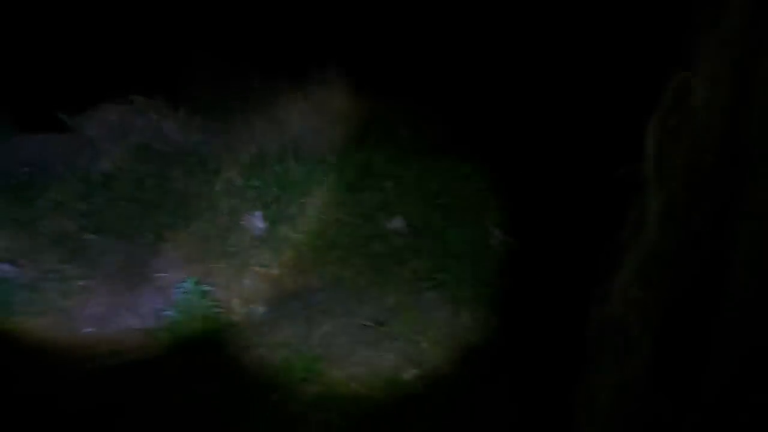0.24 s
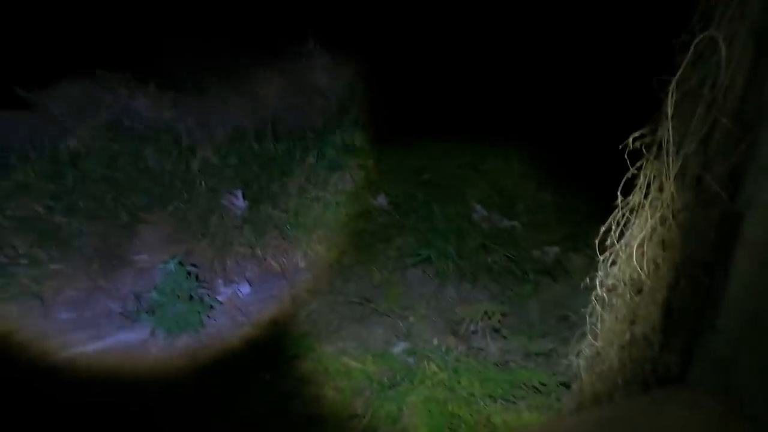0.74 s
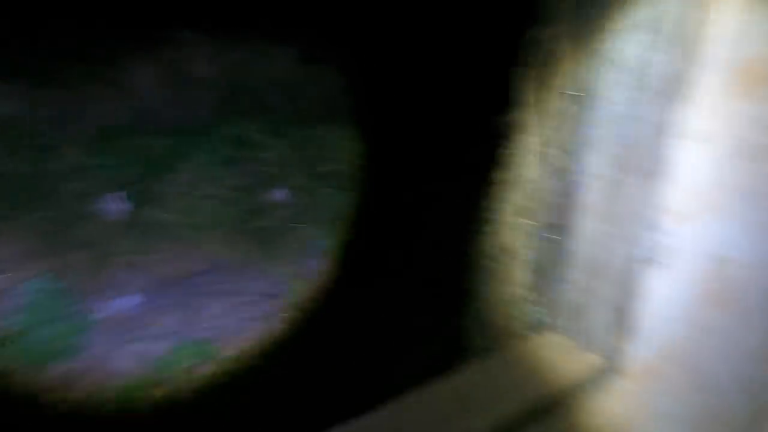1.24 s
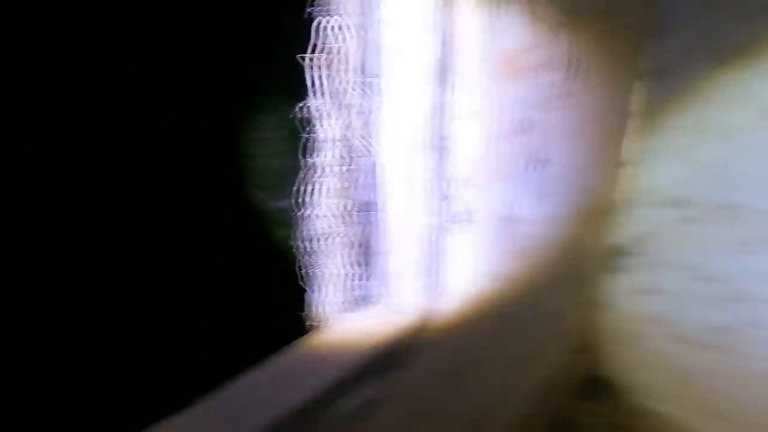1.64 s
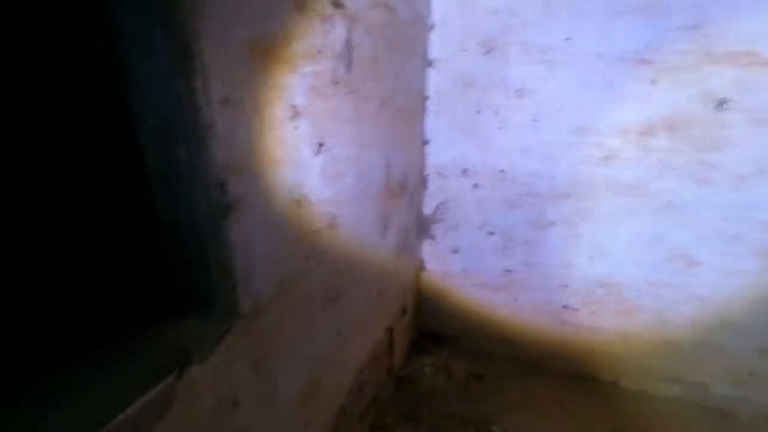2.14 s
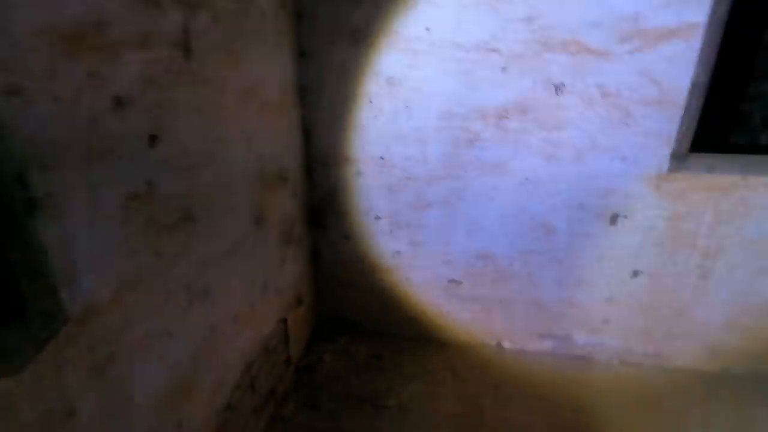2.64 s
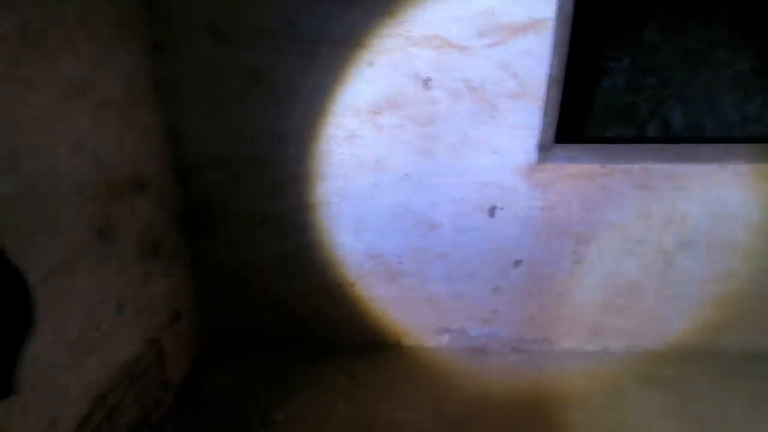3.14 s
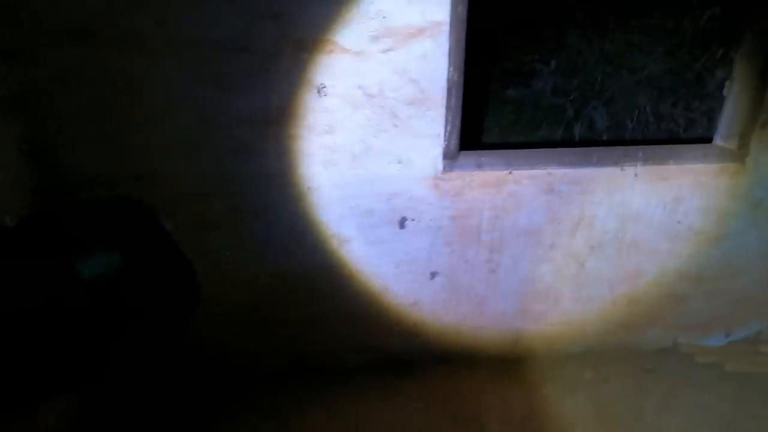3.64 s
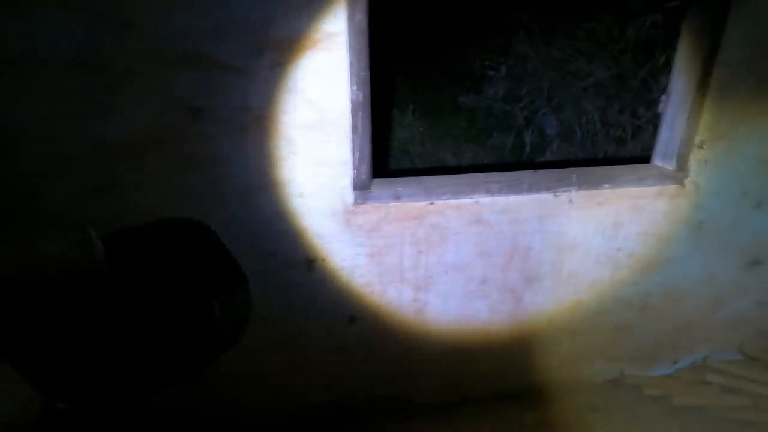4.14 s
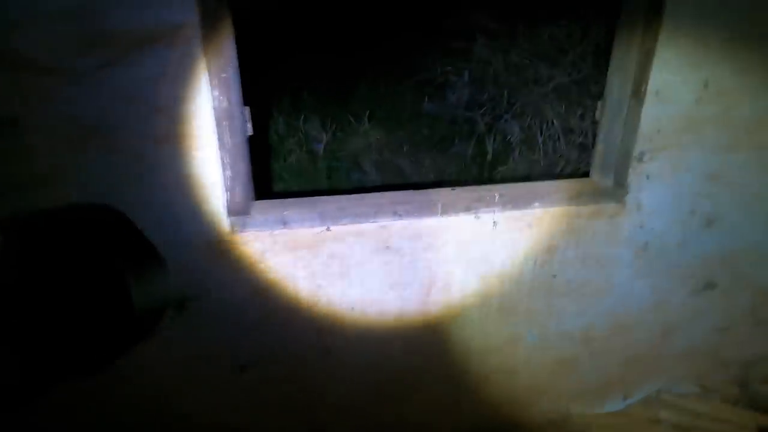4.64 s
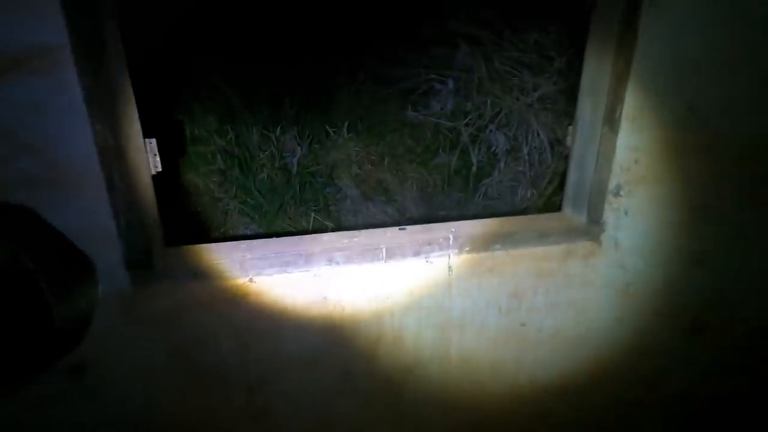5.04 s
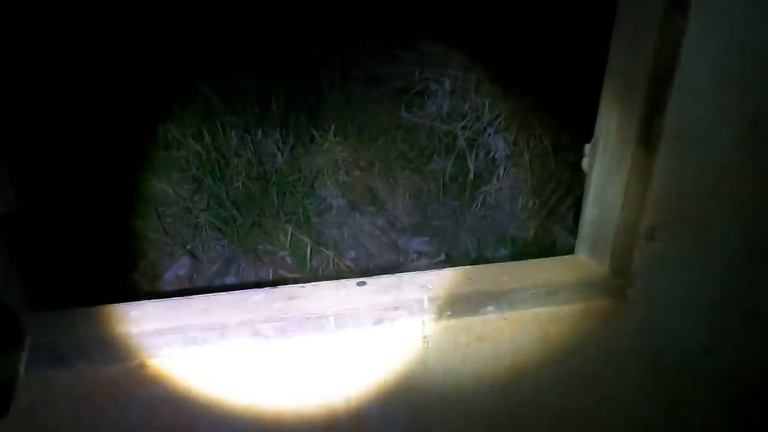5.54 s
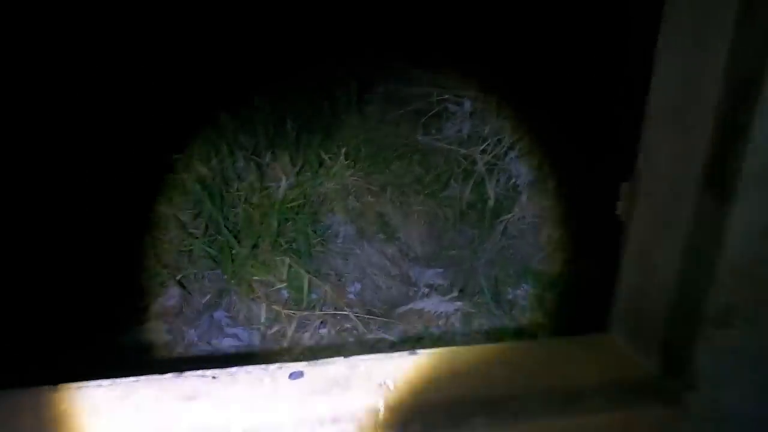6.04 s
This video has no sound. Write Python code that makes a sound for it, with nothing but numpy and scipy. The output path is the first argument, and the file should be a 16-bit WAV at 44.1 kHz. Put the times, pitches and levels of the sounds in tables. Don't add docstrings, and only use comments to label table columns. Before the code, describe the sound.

Close handheld microphone in a small bare room at night. Crickets pulse beyond open windows over faint steady air. A dull heel thud and cloth scuff come first, with low handling rumble; later, grit crackles underfoot, a metal scrap clinks, and hard debris snaps sharply with a short ringing slat and live wall reflections. Light scuffs and a hand jolt end it.

```python
import sys
import numpy as np
from scipy import signal
from scipy.fft import rfft, irfft, next_fast_len
from scipy.io import wavfile
from scipy.ndimage import uniform_filter1d

SR = 44100
rng = np.random.default_rng(int(sys.argv[2]) if len(sys.argv) > 2 else 0)


def attenuation_scalar(level_db):
    decades = np.asarray(level_db, float) / 20
    return 10 ** decades


def master_out(mix):
    frames = np.transpose(np.atleast_2d(mix))
    ceiling = np.clip(frames, -1, 1)
    pcm = np.round(ceiling * 32767).astype(np.int16)
    wavfile.write(sys.argv[1], SR, pcm)


N = 277389
T = np.arange(N) / SR
SHADE = .5

# [t/s, low choir level/dB, high choir level/dB]
CHORUSES = [
    [(0, -71, -79), (1.1, -57, -67), (1.98, -57.5, -63), (2.53, -56, -59.5), (3.1, -60, -56.5),
     (3.93, -61, -54), (4.5, -64.5, -56), (5.75, -69, -61), (5.82, -71, -58), (6.29, -77, -59)],
]


def snaps():
    # [t/s, delay/s]
    floor_bounce = [(4.5, .0028), (5.0, .0033), (5.25, .0033), (5.4, .0026)]
    out, near = np.zeros((2, 2, N))
    sounds = grit() + chips() + shards(near) + kicks()
    for s, sound, direct_db, bounce_db in sounds:
        add(out, s, sound)
        add(near, s, (attenuation_scalar(direct_db) - 1) * signal.lfilter([1 - SHADE], [1, -SHADE], sound))
        add(near, s + curve(floor_bounce, s), attenuation_scalar(4 + bounce_db) * sound, 1)
    low_cut = signal.butter(2, 450, "high", fs=SR, output="sos")
    return signal.sosfilt(low_cut, room(out, tail_db=6.0) + near)


def grit():
    # [t/s, level/dB, brightness/dB, hollowness/dB]
    grains = [(2.82, -67, 12, -1), (2.884, -85, 28, 5), (2.907, -53.5, -11, -2.5), (3.64, -58, -22.5, 2.5),
              (3.735, -52.5, -11, 5), (3.744, -69, 6, 1), (3.769, -56, -4, 1), (3.791, -58, 0.5, 12.5),
              (3.887, -60, -7, 16), (3.939, -54.5, -0.5, 9), (4.194, -52, -13, -11), (4.323, -72, 7, -2),
              (4.371, -80, 14.5, 4), (4.42, -51, -9, -11), (4.556, -45.5, 3, 4), (4.66, -55.5, -9.5, 15.5),
              (4.673, -44.5, 3, 0.5), (4.675, -46, 11.5, -5.5), (4.694, -57, 7, -8), (4.8077, -53, 11, -3),
              (4.837, -44.5, 1, 0), (5.3047, -38, -6.5, -3), (5.597, -50.5, 5.5, 11.5), (5.612, -42, 1, -1),
              (5.686, -45, 7, -25), (6.141, -51.5, -5.5, 8), (6.145, -55, 6, 4), (6.154, -52, 8, -4),
              (6.1815, -52, -11, 3), (6.257, -55, -16, 5)]
    lucks = rng.standard_normal((len(grains), 2, 513))
    return [(s, crack(*manner_db, luck), 0, 0) for (s, *manner_db), luck in zip(grains, lucks)]


def chips():
    # [t/s, level/dB, f/Hz, width/Hz]
    splits = [
        (5.4366, -24.5, 1370, 500),
    ]
    return [(s, attenuation_scalar(db) * ring(hz, width), 9, 0) for s, db, hz, width in splits]


def shards(near):
    # [t/s, level/dB, direct above usual/dB, floor bounce above usual/dB, extra wall slap/dB]
    splits = [
        (5.0338, -33.5, 9, 3.5, -12),
        (5.067, -20, 7, 5, -10),
        (5.1952, -17, 4, 1, -10),
        (5.417, -16.5, 3, 0, 1.5),
        (5.438, -14, -9, 1.5, 2),
    ]
    # [f/Hz, level/dB]
    colours = [
        [(350, -59), (600, -39), (1700, -3), (2940, -1), (3560, -6), (5010, 3.5), (8320, -14), (11700, -16),
         (15800, -62)],
        [(350, -51), (600, -24.5), (2600, -0.5), (3420, -7), (4550, 1.5), (7560, -17.5), (10400, -35),
         (11600, -23), (15800, -61)],
        [(350, -48), (600, -32), (2270, -1), (3020, -8), (4140, 2.5), (7770, -5), (9160, -14.5), (11200, -5),
         (15800, -34)],
        [(350, -47), (600, -25), (880, -7), (1630, 1), (3920, -1), (4430, -13), (6960, -3), (11700, -31),
         (15800, -47)],
        [(350, -46), (600, -6), (660, -14), (1020, -8), (1680, 1), (2600, -5.5), (5010, -3.5), (11600, -26.5),
         (15800, -46)],
    ]
    split_s, split_hz, slap_s = .0008, 2300, .0093
    bins = np.fft.rfftfreq(1024, 1 / SR)
    sounds = []
    for k, ((s, db, direct_db, bounce_db, slap_db), colour) in enumerate(zip(splits, colours)):
        late = split_s * np.sin(np.pi * bins / split_hz + 2 * k) ** 4
        sound = click(db + read(colour, bins), late)
        sounds.append((s, sound, direct_db, bounce_db))
        add(near, s + slap_s, attenuation_scalar(slap_db) * sound, 3)
    return sounds


def kicks():
    # [t/s, level/dB, pitch factor]
    hits = [
        (4.551, -45.5, 1.002),
        (4.563, -41, 1.01),
        (4.579, -48, 1.003),
        (5.355, -48.5, .995),
    ]
    # [f/Hz, level/dB, t60/s]
    scrap = [(1965, -13, 0.048), (2470, -14, .04), (2874, -5, 0.044), (3220, -8, 0.034), (4660, -15, 0.035),
             (4883, -9.5, 0.043), (5760, -14.5, 0.55), (5695, -0.5, 0.053), (8812, -18, 0.028),
             (10000, -21, .025), (11130, -16, .04), (11700, -16, .025), (12900, -26, .04),
             (14700, -32, .05)]
    sounds = []
    for s, db, factor in hits:
        modes = [attenuation_scalar(g) * ring(hz * factor, width_of(t60), .3) for hz, g, t60 in scrap]
        sounds.append((s, attenuation_scalar(db) * sum(modes), 9, -10))
    return sounds


def crack(db, bright_db, hollow_db, luck):
    # [f/Hz, level/dB]
    grit_colour = [(400, -29), (900, -3.5), (1300, 1), (2600, 6), (3200, 3), (4300, 3.5), (5700, 3),
                   (7400, -1), (8600, -10), (10000, -14), (11500, -15.5), (12800, -19), (14500, -45),
                   (17000, -95)]
    ends_hz = [1300, 8000]
    hz = np.fft.rfftfreq(1024, 1 / SR)
    uneven = evened(uniform_filter1d(luck, 16, 1))
    place = read(np.c_[ends_hz, [-1, 1]], hz)
    colour_db = read(grit_colour, hz) + db + bright_db * place + hollow_db * place ** 2
    return click(colour_db + 2.4 * uneven[0], late=.0005 * abs(uneven[1]))


def click(colour_db, late=0.):
    log_gain = np.log(attenuation_scalar(colour_db))
    mirrored = np.r_[log_gain, log_gain[-2:0:-1]]
    causal = np.exp(np.conj(signal.hilbert(mirrored)))[:len(log_gain)]
    phase = 2 * np.pi * np.cumsum(late + 0 * log_gain) * SR / 1024
    return 7 * irfft(causal * np.exp(-1j * phase))[:512]


def thuds():
    # [t/s, level/dB, f/Hz, width/Hz]
    heels = [(.177, -37.5, 191, 112), (2.695, -44, 156, 95), (3.116, -47.5, 170, 80), (3.215, -48, 180, 82),
             (3.638, -46, 303, 117), (4.036, -42, 163, 98), (4.19, -49, 203, 100), (4.532, -30, 277, 115),
             (4.553, -29, 174, 99.3), (5.065, -46.5, 386, 148), (5.194, -41, 336, 152),
             (5.3117, -36.5, 322, 81), (5.331, -45, 310, 89.6), (5.3545, -41.5, 255, 110),
             (5.417, -30.5, 422, 149), (5.438, -31, 406, 152), (5.47, -37.5, 223, 50),
             (6.149, -46, 300, 90), (6.212, -51, 300, 70), (6.259, -43, 500, 100), (6.268, -46, 523, 110)]
    out = np.zeros((2, N))
    for s, db, hz, width in heels:
        add(out, s, attenuation_scalar(db + 9.5) * ring(hz, width, .06))
    return signal.sosfilt(signal.butter(4, 120, "high", fs=SR, output="sos"), out)


def slat():
    # [f/Hz, level/dB, t60/s]
    slat_modes = [(1387, -3, 0.29), (1460, -4.5, 0.76), (1615, -1, 0.24), (1750, -11, 0.63),
                  (1740, 0, 0.11), (1976, -8, 0.94), (1980, -11, 0.19), (2175, -4, 0.25), (2330, -6, 0.67),
                  (2370, -6, 0.69), (2440, -9, 5.0), (2740, -7, 1.4)]
    # t/s, level/dB, longest t60/s
    blow = (5.446, -35.5, 0.35)
    s, hit_db, longest = blow
    out = np.zeros((2, N))
    for k, (hz, db, t60) in enumerate(slat_modes):
        mode = ring(hz, width_of(min(t60, longest)), .5)
        add(out, s + .0007 * k, attenuation_scalar(hit_db + db) * mode, 6 * (-1) ** k)
    return out


def tread():
    # [f/Hz, width/Hz, level/dB]
    board_modes = [(174, 18, 1), (184, 46, 2.5), (251, 140, -2), (300, 18, -0.5), (377, 37, -25),
                   (407.5, 35.4, 3.5), (542.7, 28, -0.5)]
    # [start t/s, hold/s, level/dB]
    pushes = [(0, 0.03, -60), (.185, 0.02, -59), (.44, 1.27, -63.5), (2.1, 0.056, -62), (2.2, 0.83, -71),
              (2.7, 0.13, -63), (2.96, 0.032, -54.5), (3.1, 0.22, -58.5), (3.4, 0.16, -61.5),
              (3.64, 0.1, -56.5), (3.75, 0.095, -53.5), (3.96, 0.2, -53.5), (4.2, 0.37, -60.5),
              (4.55, 0.19, -48.5), (4.8, 0.17, -56.5), (5.1, 0.022, -54.5), (5.196, 0.035, -61),
              (5.31, 0.12, -49), (5.6, 0.076, -50.5), (5.86, 0.2, -58.5), (6.15, 0.12, -50.5)]
    push_shape = (300, 130, -81)

    def boards(hz, t):
        modes = sum(attenuation_scalar(2 * db) / (1 + (2 * (hz - f) / w) ** 2) ** 2 for f, w, db in board_modes)
        return 10 * np.log10(modes) - 0.72 * np.maximum(145 - hz, 0) + 0 * t

    coarse = T[::64]
    weight_db = np.interp(T, coarse, strokes(pushes, np.transpose(pushes)[2], push_shape, coarse))
    return attenuation_scalar(weight_db) * evened(hiss(boards, size=1024, patchy_db=2.5, flicker_db=2.0, apart=1.15))


def scuff():
    # [f/Hz, level/dB per Hz]
    sole_colour = [(290, -35), (500, -3.5), (821, -5.5), (1390, 0.5), (3220, -5), (4360, -5.5),
                   (4730, -6.5), (7160, -11.5), (9050, -19.5), (11900, -25.5), (13500, -34)]
    # [start t/s, hold/s, level/dB]
    drags = [(0.072, 0.31, -64), (0.792, 0.43, -70.5), (1.17, 0.26, -69), (1.52, 0.44, -69.5),
             (2.054, 0.44, -70), (2.636, 0.15, -71), (2.889, 0.29, -62), (3.275, 0.27, -64),
             (3.654, .04, -61.5), (3.777, 0.024, -55.5), (3.89, 0.13, -57), (4.086, 0.17, -62.5),
             (4.42, 0.25, -62), (4.684, 0.018, -56.5), (4.802, 0.15, -61), (5.018, 0.98, -66),
             (6.15, 0.0087, -61), (6.162, .13, -64)]
    drag_shape = (180, 79, -85)
    # [start t/s, hold/s, level/dB]
    rustles = [
        (3.74, 0.087, -82),
        (3.86, .1, -79),
        (4.33, 0.062, -77.5),
        (6.147, 0.013, -80),
        (6.2, .01, -76),
    ]
    # [f/Hz, level/dB per Hz]
    sleeve_colour = [(4000, -7), (6500, -6), (8500, -9.5), (10000, -13.5), (11700, -12), (14000, -22),
                     (15500, -24), (17000, -60)]
    rustle_shape = (400, 170, -110)

    def colour(hz, t):
        level_db = strokes(drags, np.transpose(drags)[2], drag_shape, t)
        tilt_db = np.minimum(-1.5 + 0.036 * (level_db + 56.0), .5)
        top_db = -np.maximum(hz - 13500, 0) / 120
        octaves = np.log2(np.clip(hz, 300, 7000) / 1500)
        sole_db = read(sole_colour, hz) + top_db + level_db + tilt_db * octaves
        rustle_db = strokes(rustles, np.transpose(rustles)[2], rustle_shape, t)
        sleeve_db = 4.5 + read(sleeve_colour, hz) + rustle_db
        return 20 * np.log10(np.hypot(attenuation_scalar(sole_db), attenuation_scalar(sleeve_db)))

    return attenuation_scalar(-5.) * hiss(colour, size=256, patchy_db=2.0, flicker_db=1.0)


def tick():
    # level/dB, f/Hz, length/s, level per echo/dB
    tap = (-29.5, 1950, .0012, -9)
    db, hz, length, echo_db = tap
    tap_s, wall_s = 3.0177, .0066
    out = np.zeros((2, N))
    for k in range(4):
        add(out, tap_s + k * wall_s, attenuation_scalar(db + k * echo_db) * chirp(hz, length, 0, 0))
    return out


def fingers():
    # [t/s, level/dB, brightness/dB, hollowness/dB]
    touches = [(.79, -63, 12, 3), (1.2376, -63, 20, 5), (2.934, -62, 8, -6), (4.281, -69, 18, -0.5),
               (4.3214, -48, -4, 0), (4.338, -68, 18, 0), (4.3676, -60, 10, 4), (4.38, -66.5, 16, 0),
               (4.441, -66, 16, 2), (4.527, -62, 14, 0), (4.7756, -59, 0, -10)]
    out = np.zeros((2, N))
    for (s, *manner_db), luck in zip(touches, rng.standard_normal((len(touches), 2, 513))):
        add(out, s, crack(*manner_db, luck), 3.0)
    return out


def rumble():
    # [f/Hz, level/dB per Hz]
    rumble_colours = [
        [(10, -9), (20, 2), (32, 6), (50, 3), (70, -29), (100, -96)],
        [(35, -47), (55, -7), (75, -0.5), (110, -8.5), (140, -10.5), (200, -69)],
    ]
    # [start t/s, hold/s, deep level/dB, upper part above it/dB]
    gusts = [(0, 0.049, -57, 8), (0.103, 0.22, -53, -0.5), (0.412, 0.052, -51, 0.5),
             (0.502, 0.6, -58.5, 3.5), (1.097, 0.06, -55, 2.5), (1.232, 0.12, -56, -23),
             (1.398, 0.22, -54, 2.5), (1.58, 0.052, -48, -11), (1.68, 0.12, -55.5, -6.5),
             (1.836, 0.028, -46, -8), (2.01, 0.21, -61.5, -8), (2.238, 0.13, -60.5, 0),
             (2.377, 0.16, -57, -14), (2.647, 0.2, -64.5, 6), (2.898, 0.15, -52, -4),
             (3.223, 0.027, -51.5, -15), (3.297, .03, -59, -14), (3.486, .03, -58, -27),
             (3.821, 0.04, -51.5, -10), (4.036, 0.024, -55, 2.5), (4.14, 0.34, -74, 12),
             (4.572, 0.027, -64, 19), (4.74, .03, -60.5, 7), (4.9, 0.26, -65.5, -18),
             (5.317, 0.065, -71, 14), (5.528, 0.11, -59, -22), (5.734, 0.052, -55.5, -4.5),
             (5.908, 0.25, -63.5, -5), (6.136, 0.069, -56, 4)]
    gust_shape = (206, 164, -101)
    # [t/s, level/dB, f/Hz, length/s]
    jolts = [
        (6.15, -36, 31.6, 0.041),
    ]
    # [t/s, left minus right/dB]
    wind_lean = [(0.0, -1), (1.21, -2), (1.49, -0.5), (2.63, -1), (3.01, -7), (3.48, -7), (3.8, -9),
                 (4.17, 0), (5.71, -2), (6.29, -5)]

    def parts(hz, t):
        levels_db = []
        for k, colour in enumerate(rumble_colours):
            gust_db = [deep_db + k * upper_db for _, _, deep_db, upper_db in gusts]
            levels_db.append(read(colour, hz) + strokes(gusts, gust_db, gust_shape, t))
        return 20 * np.log10(np.hypot(*attenuation_scalar(levels_db)))

    lumps = attenuation_scalar(-2.0) * hiss(parts, size=2048, patchy_db=-0.5, flicker_db=2.5, apart=1.0)
    for s, db, hz, length in jolts:
        add(lumps, s, attenuation_scalar(db) * chirp(hz, length, 0, 0))
    return lumps * attenuation_scalar(np.outer([.5, -.5], curve(wind_lean, T)))


def crickets():
    # [length/s, pitch arch/Hz, pitch fall/Hz, left minus right/dB, stroke peak/dB]
    manners = [
        (.045, 90, 30, 0, 4.5),
        (.048, 60, -40, -3, 4.5),
        (.05, 90, 200, 2, 5.5),
        (.03, 20, 120, 0, 5),
        (.11, 40, 60, 3, 1),
        (.04, 40, 110, -3, 3.5),
        (.04, 60, 40, 0, 4),
        (.04, 40, -50, -2, 4),
    ]
    overtone_db = [-40, -21, -40, -40, -40, -40, -22, -22]
    # [f/Hz, spread/Hz, period/s, length/s, pitch fall/Hz]
    choirs = [
        (3780, 170, .12, .04, 90),
        (4300, 70, .08, .03, 130),
    ]
    singers = [10, 5]
    out = np.zeros((2, N))
    for rows, (length, arch_hz, fall_hz, pan_db, peak_db), octave_db in zip(solos(), manners, overtone_db):
        for s, db, hz in rows:
            stroke = chirp(hz, length, arch_hz, fall_hz)
            stroke = stroke + attenuation_scalar(octave_db) * chirp(2 * hz, length, 2 * arch_hz, 2 * fall_hz)
            add(out, s - length / 2, attenuation_scalar(db + peak_db) * stroke, pan_db)
    for k, (hz, spread_hz, period, length, fall_hz) in enumerate(choirs):
        choir = np.zeros((2, N))
        own_pitches = np.linspace(-1.5, 1.5, singers[k])
        for own, (pace, side) in zip(own_pitches, rng.uniform(-1, 1, (singers[k], 2))):
            luck = rng.standard_normal((120, 3))
            times = np.cumsum(period * (1 + .15 * pace + .12 * luck[:, 0])) - period
            for s, (_, loud, sharp) in zip(times[times < T[-1]], luck):
                stroke = chirp(hz + spread_hz * (own + 0.324 * sharp), length, 80, fall_hz)
                add(choir, s, attenuation_scalar(2.2 * loud) * stroke, 3.5 * side)
        out += attenuation_scalar(curve(CHORUSES[0], T, count=k + 1) - 9.0) * evened(choir)
    return out


def solos():
    # [t/s, level/dB]
    high = [(.039, -61), (.128, -62), (.221, -62), (.316, -61), (.404, -59), (.494, -63), (.585, -65),
            (.675, -62), (.769, -59.5), (.857, -59.5), (1.036, -62), (1.13, -63), (1.225, -59.5),
            (1.315, -61), (1.404, -63), (1.497, -61), (1.682, -60)]
    low = [(0, -62.5), (.105, -62), (.25, -61), (.378, -61), (.508, -57), (.642, -58.5), (.778, -56),
           (.908, -57.5), (1.043, -58.5), (1.172, -60.5), (1.306, -59), (1.438, -57.5), (1.565, -61.5)]
    falling = [(.828, -63), (.935, -63), (1.034, -63), (1.128, -62), (1.233, -61.5), (1.335, -61),
               (1.429, -64), (1.531, -64), (1.633, -66), (1.737, -66), (1.827, -66), (1.93, -75),
               (2.036, -70)]
    stray = [
        (.406, -71),
        (.523, -77),
        (.758, -69),
    ]
    # [t/s, level/dB]
    croaks = [(.121, -70), (.262, -71), (.863, -73), (1.212, -72), (1.488, -69), (1.806, -70), (2.426, -69),
              (2.733, -69), (2.911, -68), (3.274, -70), (3.375, -66), (3.524, -72), (3.738, -64),
              (3.932, -65), (4.062, -66), (4.195, -67), (4.338, -65), (4.444, -68)]
    near_hz = [4165, 3628, 3990, 5660, 2360]
    # [first stroke t/s, period/s, strokes, f/Hz]
    steady = [
        (1.623, .1013, 11, 5170),
        (.098, .131, 7, 3845),
        (.02, .1315, 11, 3760),
    ]
    skipped = [
        [0, 1, 3, 4, 7, 8],
        [],
        [],
    ]
    steady_db = [-68, -66, -66.5]
    uneven_db, uneven_hz, uneven_s = 1.2, 12, .003
    near = [high, low, falling, stray, croaks]
    out = [[(s, db, hz) for s, db in rows] for rows, hz in zip(near, near_hz)]
    for (first, period, count, hz), rests, db in zip(steady, skipped, steady_db):
        late, loud, sharp = rng.standard_normal((count, 3)).T
        times = first + period * np.arange(count) + uneven_s * late
        rows = np.c_[times, db + uneven_db * loud, hz + uneven_hz * sharp]
        out.append(np.delete(rows, rests, axis=0))
    return out


def pairs():
    # [first t/s, period/s, pairs]
    doubles = [
        (2.32, .099, 8),
        (3.117, .0966, 33),
    ]
    hz, gap_s, length = 4465, .028, .021
    out = np.zeros((2, N))
    for first, period, count in doubles:
        for k, luck in enumerate(rng.standard_normal((count, 2))):
            for early, loud in zip([gap_s, 0], luck):
                stroke = chirp(hz, length, 60, 120)
                add(out, first + k * period - early - length / 2, attenuation_scalar(1.5 * loud) * stroke)
    return attenuation_scalar(curve(CHORUSES[0], T, count=2) + 0.5) * out


def chirp(hz, length, arch_hz, fall_hz):
    u = np.linspace(0, 1, round(length * SR))
    pitch = hz + arch_hz * (np.sin(np.pi * u) - .6) - fall_hz * (u - .5)
    return np.sin(2 * np.pi * np.cumsum(pitch) / SR) * np.sin(np.pi * u)


def trills():
    # [from t/s, to t/s, f/Hz, width/Hz, level/dB]
    far_lines = [
        (1.35, 2.691, 5130, 30.5, -73),
        (1.405, 4.5, 5660, 59.5, -80),
    ]
    out = np.zeros((2, N))
    for s, end, hz, width, db in far_lines:
        t = np.arange(round((end - s) * SR)) / SR
        fuzz = uniform_filter1d(rng.standard_normal((2, N)), int(SR / width), axis=1)[:, :len(t)]
        line = evened(fuzz[0] * np.cos(2 * np.pi * hz * t) + fuzz[1] * np.sin(2 * np.pi * hz * t))
        add(out, s, attenuation_scalar(db) * line * signal.windows.tukey(len(t), .4), -2.5)
    return out


def night():
    # [f/Hz, level/dB per Hz]
    air = [(82, -44), (120, -32), (150, -1), (304, -1.5), (711, -29), (1060, -8), (2990, -15.5), (3610, -3),
           (4360, -3.5), (6010, -20.5), (7400, -19), (10000, -35.5), (11600, -30), (12800, -37),
           (14200, -76), (22000, -120)]
    steady = hiss(lambda hz, t: read(air, hz) + 0 * t, size=1024, patchy_db=0.05, flicker_db=0.65)
    return attenuation_scalar(-60) * evened(steady)


def room(x, tail_db, start=.011, early=0.89, apart=0.67):
    # [f/Hz, t60/s]
    dying = [(150, 0.36), (400, 0.44), (1300, 0.63), (3000, 0.49), (6000, 0.48), (12000, 0.38)]
    echo_s = [.0059, .0088, .0097, .0103, .0112, .0185, .0245, .031]
    # [level/dB, left minus right/dB]
    echo_levels = [(-22, -4), (-6, -4), (-3, 4), (1, 3), (-5, -4), (-13, 3), (-9, -3), (-9, 3)]
    build_s = .014
    taps = np.zeros((3, SR))
    at = np.arange(round(start * SR), SR - 50, 16) + rng.integers(0, 12, (3, 1))
    at = at + rng.integers(0, 14, at.shape)
    np.put_along_axis(taps, at, rng.standard_normal(at.shape), 1)
    taps = 0.92 * taps[0] + apart * taps[1:]
    taps = taps * np.clip(.35 + (np.arange(SR) / SR - start) / build_s, 0, 1)
    hz, t, z = signal.stft(taps, SR, nperseg=256)
    tail = signal.istft(z * attenuation_scalar(-60 * t / read(dying, hz)[:, None]), SR, nperseg=256)[1]
    tail = attenuation_scalar(tail_db) * tail / np.linalg.norm(tail[0])
    tail[:, :12] += (1 - SHADE) * SHADE ** np.arange(12)
    for s, (db, pan_db) in zip(echo_s, echo_levels):
        for ear, sign in enumerate([1, -1]):
            tail[ear, round(s * SR - sign * pan_db / 7)] += early * attenuation_scalar(db + sign * pan_db / 2)
    return signal.fftconvolve(x, tail, axes=1)[:, :N]


def hiss(level, size, patchy_db, flicker_db, apart=0.78):
    # [f/Hz, likeness 0-1]
    likeness = [(30, 0.84), (70, 1), (180, 0.8), (550, 0.71), (1650, 0.48), (4970, 0.79), (15000, 0.47)]
    hop = size // 4
    hz, t = np.fft.rfftfreq(size, 1 / SR)[:, None], np.arange(N // hop + 5) * hop / SR
    a, b, c, d, patches = rng.standard_normal((len(t), len(hz), 5)).T
    patches = evened(uniform_filter1d(uniform_filter1d(patches, 8, 0), 8, 1))
    flicker = np.tanh(evened(uniform_filter1d(rng.standard_normal(len(t)), 5)))
    same = np.clip(apart * read(likeness, hz), -1, 1)
    left = a + 1j * b
    z = np.array([left, same * left + np.sqrt(1 - same ** 2) * (c + 1j * d)])
    z *= attenuation_scalar(level(hz, t) + patchy_db * patches + flicker_db * flicker)
    return signal.istft(z, nperseg=size, noverlap=size - hop)[1][:, :N]


def strokes(rows, levels_db, shape, t):
    rise, fall, rest_db = shape
    s, hold = np.transpose(rows)[:2, :, None]
    before, after = np.maximum(s - t, 0), np.maximum(t - s - hold, 0)
    each_db = np.asarray(levels_db)[:, None] - rise * before - fall * after
    return 10 * np.log10(attenuation_scalar(2 * rest_db) + attenuation_scalar(2 * each_db).sum(0))


def ring(hz, width, length=.03):
    t = np.arange(round(length * SR)) / SR
    return np.sin(2 * np.pi * hz * t) * np.exp(-np.pi * width * t) * (1 - np.exp(-3 * hz * t))


def width_of(t60):
    return np.log(1000) / np.pi / t60


def evened(x):
    return x / np.sqrt(np.mean(x ** 2) + 1e-20)


def read(points, hz):
    f, value = np.transpose(points)
    return np.interp(np.log(hz + 1), np.log(f + 1), value)


def curve(table, t, count=1):
    columns = np.transpose(table)
    return np.interp(t, columns[0], columns[count])


def add(mix, s, sound, pan_db=0.):
    part = mix[:, max(round(s * SR), 0):][:, :len(sound)]
    part += attenuation_scalar([[pan_db / 2], [-pan_db / 2]]) * sound[:part.shape[1]]


def scene():
    steps = snaps() + slat() + room(thuds(), tail_db=2.0, start=.016, early=0.2, apart=0.1)
    steps = steps + tread() + scuff()
    camera = tick() + fingers() + rumble()
    outside = crickets() + pairs() + trills() + night()
    return steps + camera + outside


def roll_off(x):
    return signal.sosfilt(signal.butter(12, 15990, fs=SR, output="sos"), x)


def record(dry):
    # [f/Hz, level/dB]
    mic_top = [(13600, 0), (16000, -18)]
    # [f/Hz, left minus right/dB]
    left_treble = [(5000, 0.5), (8000, 3.5)]
    size = next_fast_len(N)
    hz = np.fft.rfftfreq(size, 1 / SR)
    port_db = read(mic_top, hz) + np.outer([.5, -.5], read(left_treble, hz))
    mix = irfft(rfft(dry, size) * attenuation_scalar(port_db), size)[:, :N]
    return roll_off(mix)


dry = scene()
out = record(dry)
master_out(out)
```